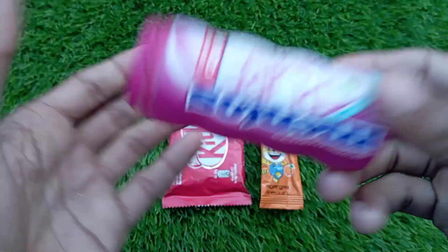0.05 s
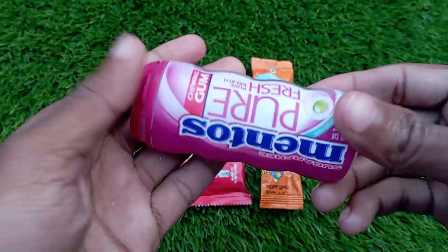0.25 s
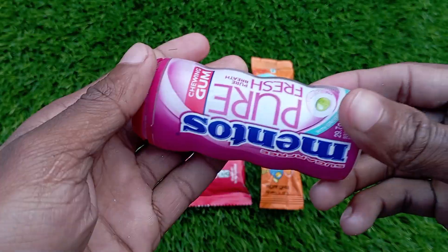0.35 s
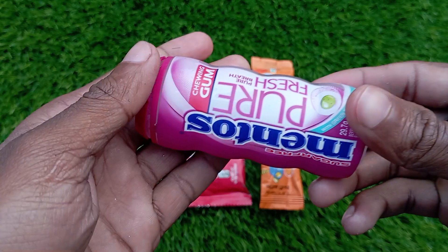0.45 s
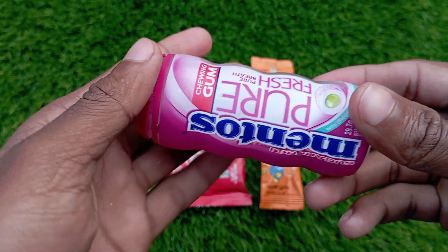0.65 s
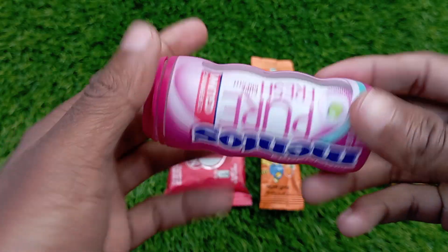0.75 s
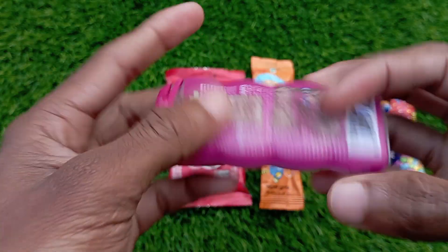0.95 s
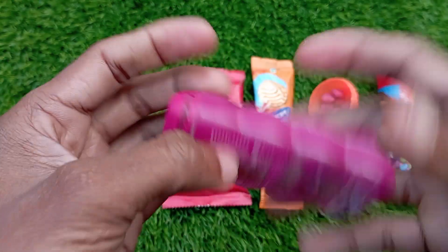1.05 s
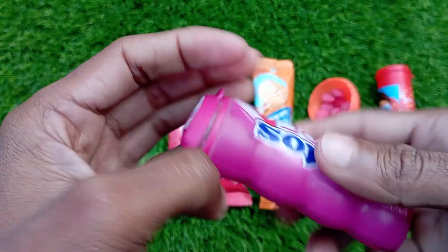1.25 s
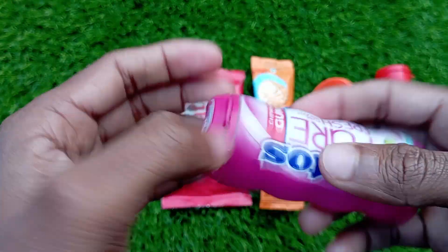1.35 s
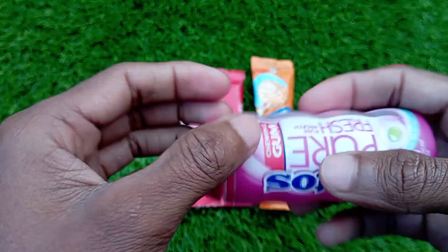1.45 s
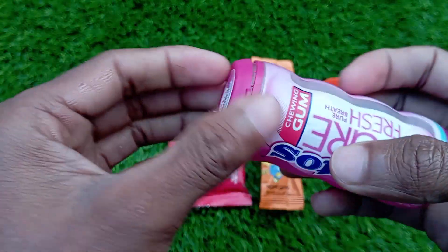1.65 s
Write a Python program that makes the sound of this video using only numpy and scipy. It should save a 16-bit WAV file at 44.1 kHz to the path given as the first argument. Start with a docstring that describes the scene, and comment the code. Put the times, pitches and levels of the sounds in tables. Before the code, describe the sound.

Close up in a dry, quiet room, hard gum pieces rattle inside a hand-held plastic bottle. A quick, sharp clatter settles into a short pause, then a longer, uneven run of clicks and light scraping follows.

```python
"""Hard-coated gum pellets in a small plastic bottle, close to the microphone in a dry room.
The bottle tips and the pellets drop against its end in two bunches and settle. After a pause it is
turned over in the hands: they slide along the wall, tumble and click against it and each other.
Each impact rings the air inside, the plastic wall and the coating; the bottle thuds softly in the hand.
Behind it lie a faint, far whistle and the low rumble of the room."""
import sys
import numpy as np
from scipy import signal
from scipy.fft import rfft, irfft, next_fast_len
from scipy.io import wavfile
from scipy.ndimage import map_coordinates

SR = 44100
rng = np.random.default_rng(int(sys.argv[2]) if len(sys.argv) > 2 else 0)


def to_wav(s):
    """Save 16-bit WAV."""
    ch = np.atleast_2d(s).T  # columns
    pcm = np.round(np.clip(ch, -1, 1) * 32767)  # PCM
    wavfile.write(sys.argv[1], SR, pcm.astype(np.int16))


N = 74970

# Pellet impacts, close to the microphone: (time [s], energy of the wall's clack [dB],
# hollow knock over clack [dB], coating snap over clack [dB], clack pitch [Hz], left over right [dB])
IMPACTS = [(0.1577, -35, -3.5, -8, 3420, -1), (0.2347, -1.5, -9, 5, 6000, -7),
           (0.2439, -2.5, -5.5, 5, 6740, 7), (0.2529, -19, -1, 18, 5000, -9.5),
           (0.2574, -16.5, 5, 7, 2020, -1), (0.277, -6, -14, 13, 3770, 0),
           (0.2792, -3.5, -0.5, -2, 3680, 6), (0.2824, -0.5, -1.5, 7.5, 5430, -2.5),
           (0.2885, -3, -9.5, 2.5, 3250, -3), (0.2922, -10.5, -10, 10, 3520, 22),
           (0.2972, -11.5, -5, 2.5, 3420, -5), (0.3045, -19.5, -3, -5.5, 3440, -6),
           (0.3317, -17, -7, 0.5, 4730, 8), (0.3405, -12.5, -6, -0.2, 4300, -0.5),
           (0.3482, -19.5, -6, -6, 2930, 2), (0.3626, -19, -11, 2.5, 4500, 1),
           (0.3794, -26, -9, -1, 3800, -1), (0.5787, -45.5, 2, -20.5, 2370, -1.5),
           (0.9111, -29.5, -1, 2.5, 2010, -4.5), (0.9224, -22.5, -9, 0.5, 5580, 0.5),
           (0.9409, -28.5, 0, 8.5, 2116, 1), (0.9712, -17, 3.5, 5.5, 2090, 1),
           (0.9798, -25.5, 8, 13.5, 1740, 0), (0.9869, -46, -2, 21, 2000, -15),
           (0.9898, -18.5, 0.5, -10, 1840, 22), (0.9952, -27, 11.5, 8, 1850, -1),
           (1.0142, -13.5, -8, 2, 5630, -1.5), (1.0361, -26, -6, 2, 2100, -3),
           (1.0454, -21.5, -4.5, -4, 1940, -3.5), (1.0504, -22.5, -4.5, 3.5, 4600, 24),
           (1.0718, -23, -5, -9, 4800, 3), (1.0759, -19, -9, 1.5, 5530, -2), (1.0843, -31, -1, -2, 2124, 7),
           (1.0917, -22, -8, 2, 4850, 24), (1.0968, -13, -4.5, -10, 2300, -6),
           (1.1049, -23.5, -1, 11.5, 3320, -2), (1.1407, -25, 2.5, -5, 4600, 3),
           (1.1631, -16.5, -17, -2, 5170, 2.5), (1.1794, -9.5, -15, -4, 3180, -4.5),
           (1.193, -16, -16, -26, 3450, -17), (1.1998, -10.5, -6.5, -6, 1940, 9),
           (1.2038, -29.5, 16, -13, 2050, -4), (1.2069, -2.5, -13.5, 1.5, 3660, -4.5),
           (1.2114, -7, -3.5, -3.5, 4170, 1.5), (1.2168, -26, 11.5, -15, 1690, 13),
           (1.2225, -23, -13, -8, 2180, -19), (1.2303, -34, 11, -24, 1880, -6),
           (1.2472, -40, -6, -12, 1920, -8), (1.256, -20, -1.5, 2, 2080, 3), (1.26, -20, -1, -14, 2050, -3),
           (1.2842, -17.5, -26, 0, 3500, -1.5), (1.2988, -7.5, -26, -7, 3770, -2.5),
           (1.3055, -19, -4, -26, 3560, -1), (1.3299, -15.5, 1.5, 3.5, 1870, -2),
           (1.3694, -17, -13, -1, 6430, -1), (1.4938, -29.5, -2, -5, 2266, 0),
           (1.5126, -12.5, -7, 2, 2400, -3.5), (1.5542, -33, -3, 2, 3530, 0),
           (1.5826, -18.5, -9.5, -11, 4520, -2), (1.6045, -14, -8, -10, 2280, -5),
           (1.6246, -17, -9, -6.5, 4360, -2), (1.6408, -15, -15, -6, 6050, -3),
           (1.65, -14.5, 0.5, -4.5, 2370, -0.5), (1.6538, -8, -23, -5.5, 3620, -2.5),
           (1.6839, -13.5, -32, 0.5, 3570, 2.5), (1.697, -13.5, -8.5, -5, 5900, 1)]
# Resonances of the air inside, the plastic wall and the coating: (frequency [Hz], width [Hz], gain [dB])
AIR_MODES = [(327, 210, -7.5), (593, 210, -7), (826.4, 264, 6), (1143, 273, 12.5), (1226, 170, -1),
             (1574, 220, -6)]
WALL_MODES = [(2139, 150, -1.5), (2374, 278, -0.5), (3250, 184, 1), (3610, 260, 0.5), (4290, 460, 1),
              (4755, 200, 3), (5110, 300, -1.5), (6190, 620, -3.5)]
COATING_MODES = [(7550, 3100, -8), (9030, 720, -0.5), (9780, 750, -1), (10925, 2000, -4.5),
                 (13000, 6000, -15.5)]


def pellet_clicks(impacts, spot_boost_db=10.5, spot_octaves=0.22):
    """Each impact rings the air in the bottle, its wall and the pellet's coating."""
    _, force_db, _, _, pitch_hz, _ = np.transpose(impacts)[:, :, None, None]
    # the spot that is struck favours the resonances near one pitch
    spot = lambda hz: amp(spot_boost_db * np.exp(-(np.log2((hz + 1) / pitch_hz) / spot_octaves) ** 2))
    knocks = ring(force_db, AIR_MODES, t60_s=0.012, contact_db=4, spread_rad=0.4, colour=spot)
    clacks = ring(force_db, WALL_MODES, t60_s=0.017, contact_db=2, spread_rad=0.76, colour=spot)
    snaps = ring(force_db, COATING_MODES, t60_s=0.018, contact_db=1, spread_rad=0.62)
    out = np.zeros((2, N))
    for (s, db, knock_db, snap_db, _, pan_db), knock, clack, snap in zip(impacts, knocks, clacks, snaps):
        click = amp(knock_db) * knock + clack + amp(snap_db) * snap
        pan = unit(amp([[pan_db / 2], [-pan_db / 2]]))
        add(out, s, amp(db) * pan * click)
    return out


def ring(force_db, modes, t60_s, contact_db, spread_rad, colour=lambda hz: 1, doubling_db=20.5):
    """A sharp contact and chatter, longer after a harder blow, excite stereo rings of energy 1."""
    t = np.arange(SR // 32) / SR
    draws = rng.standard_normal((len(force_db), 2, len(t)))
    chatter_t60_s = t60_s * 2 ** (np.maximum(force_db, -doubling_db) / doubling_db)
    chatter = draws * amp(-60 * t / chatter_t60_s)
    chatter /= np.linalg.norm(chatter, axis=2, keepdims=True)
    mid, side = np.cos(spread_rad) * chatter[:, 0], np.sin(spread_rad) * chatter[:, 1]
    lag_s = 0.00008 * np.abs(draws[:, :, -1:])  # scattered arrival at the two microphones
    contact = np.sinc((t - lag_s) * SR - 2)
    push = amp(contact_db) * contact + np.stack([mid + side, mid - side], axis=1)
    body = lambda hz: sum((-1) ** k * amp(db) * 1j * hz * width / (centre**2 - hz**2 + 1j * hz * width)
                          for k, (centre, width, db) in enumerate(modes))
    rung = filtered(push, lambda hz: body(hz) * colour(hz))
    return rung / np.linalg.norm(rung, axis=2, keepdims=True)


# Pellets settling and sliding along the wall, close up: (time [s], level [dB])
SLIDE_LEVELS = [(0.277, -45.5), (0.294, -32), (.315, -68), (0.378, -64), (0.471, -68.5), (.55, -93),
                (0.892, -93), (0.931, -50), (.99, -65), (1.025, -57), (1.05, -54.5), (1.08, -56),
                (1.129, -47), (1.17, -50.5), (1.21, -60), (1.26, -48), (1.31, -62.5), (1.35, -65),
                (1.411, -55.5), (1.46, -66), (1.54, -67), (1.572, -56.5), (1.619, -63), (1.679, -47)]
# Spectrum of their scrape: (frequency [Hz], level [dB])
SCRAPE_SPECTRUM = [(100, -22.5), (350, -5), (550, -6), (950, -5), (1450, -5.5), (2300, -3), (2900, -9.5),
                   (3600, -16.5), (6500, -20.5), (9500, -13.5), (12500, -25.5), (16000, -33)]
# How alike the two microphones hear it: (frequency [Hz], correlation [0-1])
SCRAPE_LIKENESS = [(300, .85), (1000, 0.91), (2500, 0.17), (10000, 0.045)]


def pellet_slide(rough_db=3, rough_per_s=120, tick_over_slide_db=18.5, tick_hz=2800, tick_count=150):
    """Pellets scrape unevenly along the wall, with tiny collisions on the way."""
    s, db = np.transpose(SLIDE_LEVELS)  # one level drives the scrape and the ticks
    level_db = np.interp(np.arange(N) / SR, s, db, left=-120)
    roughness = amp(rough_db * wobble(rough_per_s))
    scrape = amp(level_db) * unit(roughness * noise(SCRAPE_SPECTRUM, SCRAPE_LIKENESS))
    times = s[0] + (np.arange(tick_count) + rng.random(tick_count)) / tick_count * (N / SR - s[0])
    ticks = []  # same columns as IMPACTS
    for t, (force, snap, pitch, pan) in zip(times, rng.standard_normal((tick_count, 4))):
        tick_db = np.interp(t, s, db) + tick_over_slide_db + 4 * force
        ticks.append((t, tick_db, -5, -2 + 2 * snap, tick_hz * 2 ** (pitch / 2), 2 * pan))
    return scrape + pellet_clicks(ticks)


# The bottle bumping in the hand, close and centred: (time [s], level [dB], pitch [Hz], T60 [s])
HAND_BUMPS = [(.14, -53.5, 209.7, 0.17), (0.263, -30.5, 194.7, 0.023), (0.2803, -42.5, 166.3, .05),
              (0.514, -52.5, 218, 0.23), (1.513, -40.5, 430, 0.013)]


def bottle_bumps(rise_s=0.001):
    """The tipped bottle thuds softly in the hand: low, damped swings."""
    out = np.zeros(N)
    for s, db, hz, t60 in HAND_BUMPS:
        t = np.maximum(np.arange(N) / SR - s, 0)
        envelope = amp(db - 60 * t / t60) * (1 - np.exp(-t / rise_s))
        out += envelope * np.sin(2 * np.pi * hz * t)
    return out


# Decay of the dry room around the microphones: (frequency [Hz], T60 [s])
TAIL_DECAY = [(200, 0.36), (1000, 0.37), (4000, 0.38), (9000, 0.4), (15000, 0.11)]
# Spectrum of its tail: (frequency [Hz], level [dB])
TAIL_SPECTRUM = [(200, -10.5), (450, 3), (800, -2.5), (1200, -1), (1900, 1), (9000, -2.5), (15000, -4)]


def room_reflections(x, near_db=-14.5, near_t60_s=0.032, tail_db=-20, build_s=0.0045):
    """The hands and the table scatter the sound from close by; the room adds a short diffuse tail."""
    hz, t, spectra = signal.stft(rng.standard_normal((2, SR // 2)), SR, nperseg=256)
    fade_db = along(TAIL_SPECTRUM, hz)[:, None] - 60 * t / along(TAIL_DECAY, hz)[:, None]
    envelope = amp(fade_db) * (1 - np.exp(-t / build_s))
    tail = signal.istft(spectra * envelope, SR, nperseg=256)[1]
    near = rng.standard_normal(tail.shape) * amp(-60 * np.arange(tail.shape[1]) / SR / near_t60_s)
    response = amp(tail_db) * tail / np.linalg.norm(tail[0])
    response += amp(near_db) * near / np.linalg.norm(near[0])
    return signal.fftconvolve(x, response, axes=1)[:, :N]


# A faint, airy whistle far from the microphone, holding then sinking: (time [s], pitch [Hz], level [dB])
WHISTLE_GLIDE = [(0.646, 2850, -87), (0.711, 3040, -74.5), (0.786, 2850, -84), (.82, 2450, -71),
                 (0.911, 2200, -77)]


def far_whistle(width_hz=145):
    """A gliding tone, blurred by distance into a narrow band of noise."""
    s, pitch_hz, db = np.transpose(WHISTLE_GLIDE)
    t = np.arange(N) / SR
    phase = 2 * np.pi * np.cumsum(np.interp(t, s, pitch_hz)) / SR
    blur = filtered(rng.standard_normal((2, 2, N)), lambda hz: 1 / (1 + (hz / width_hz) ** 2))
    band = unit(blur[0] * np.cos(phase) + blur[1] * np.sin(phase))
    return np.interp(t, s, amp(db), left=0, right=0) * band


# Room tone behind the bottle: (frequency [Hz], relative level [dB])
ROOM_TONE_SPECTRUM = [(20, -46.5), (33, -24.5), (48, -16), (92, -1.5), (130, -7.5), (220, -9), (330, -14),
                      (500, -20.5), (1400, -32.5), (3000, -30.5), (5000, -36.5), (9000, -34), (13000, -40),
                      (16000, -46.5)]
# How alike the two microphones hear it: (frequency [Hz], correlation [0-1])
ROOM_TONE_LIKENESS = [(60, 1), (300, 0.66), (1000, 0), (3000, 0), (10000, 0.13)]


def room_tone(level_db=-62):
    """A steady low rumble, centred in the bass and wide in the treble."""
    return amp(level_db) * noise(ROOM_TONE_SPECTRUM, ROOM_TONE_LIKENESS)


def noise(spectrum, likeness):
    """Coloured stereo noise of rms 1, with a left-right likeness set by frequency."""
    angle = lambda hz: np.arccos(np.clip(along(likeness, hz), -1, 1)) / 2
    response = lambda hz: amp(along(spectrum, hz)) * [np.cos(angle(hz)), np.sin(angle(hz))]
    mid, side = filtered(rng.standard_normal((2, N)), response)
    return unit(np.array([mid + side, mid - side]))


def wobble(rate):
    """A smooth random curve, rate knots a second."""
    return map_coordinates(rng.standard_normal(N // 20), [np.arange(N) * rate / SR], mode="wrap")


def amp(db):
    """Decibels to gain."""
    return 10 ** (np.asarray(db) / 20)


def unit(x):
    """Scale to rms 1."""
    return x / np.sqrt(np.mean(x ** 2) + 1e-20)


def along(points, hz):
    """Read (frequency [Hz], value) points on a log axis."""
    knots_hz, values = np.transpose(points)
    return np.interp(np.log(hz + 1), np.log(knots_hz + 1), values)


def filtered(x, response):
    """Filter x by a response given as a function of frequency."""
    n = x.shape[-1]
    size = next_fast_len(2 * n)
    return irfft(rfft(x, size) * response(np.fft.rfftfreq(size, 1 / SR)), size)[..., :n]


def add(track, s, sound):
    """Mix a stereo sound into the track at time s."""
    i = int(np.clip(round(s * SR), 0, N - 1))
    track[:, i:i + sound.shape[1]] += sound[:, :N - i]


def scene():
    """The bottle close up, the room around it, a far whistle and room tone behind."""
    bottle = pellet_clicks(IMPACTS) + pellet_slide() + bottle_bumps()
    return bottle + room_reflections(bottle) + far_whistle() + room_tone()


def record(dry, top_hz=15800):
    """The recorder cuts off steeply at its band limit."""
    return filtered(dry, lambda hz: 1 / (1 + (hz / top_hz) ** 80))


dry = scene()
out = record(dry)
to_wav(out)
```